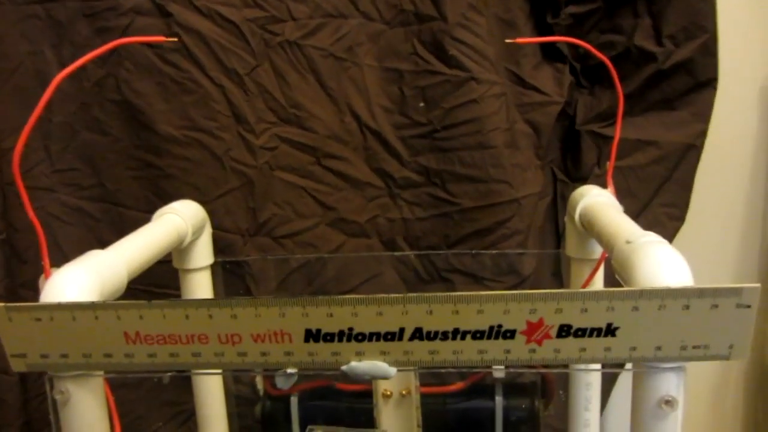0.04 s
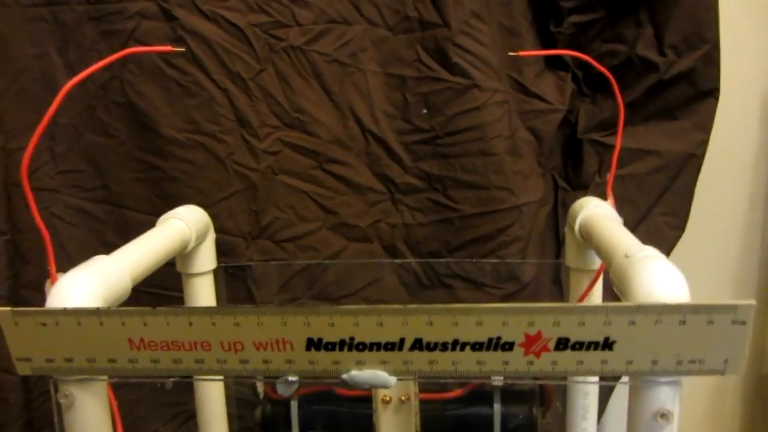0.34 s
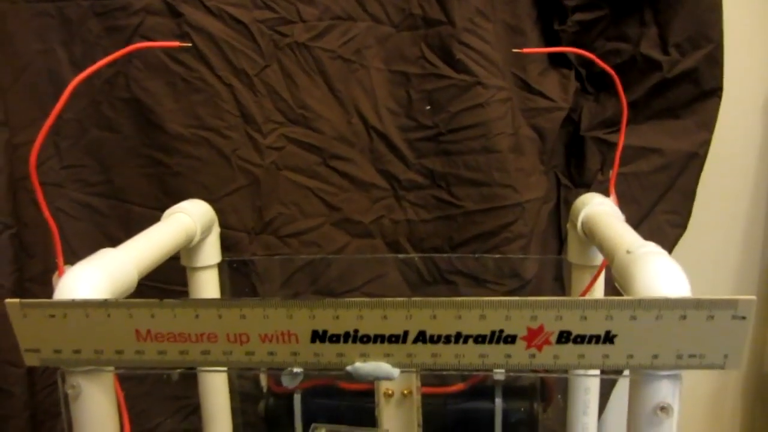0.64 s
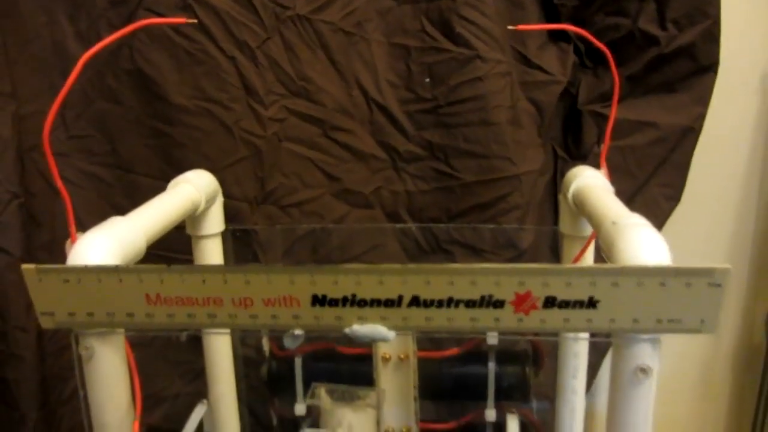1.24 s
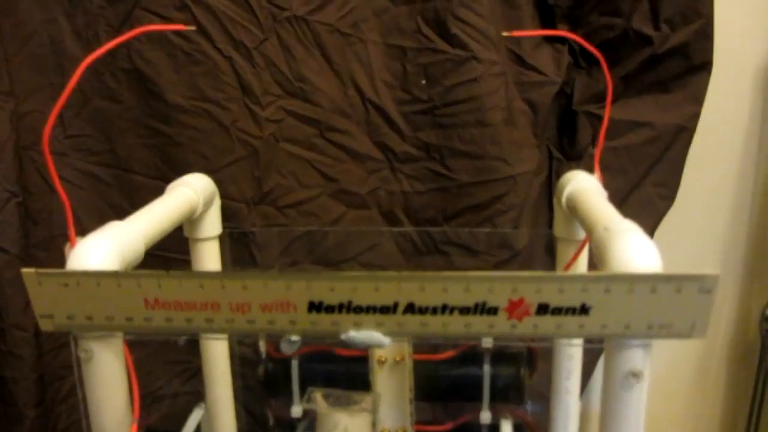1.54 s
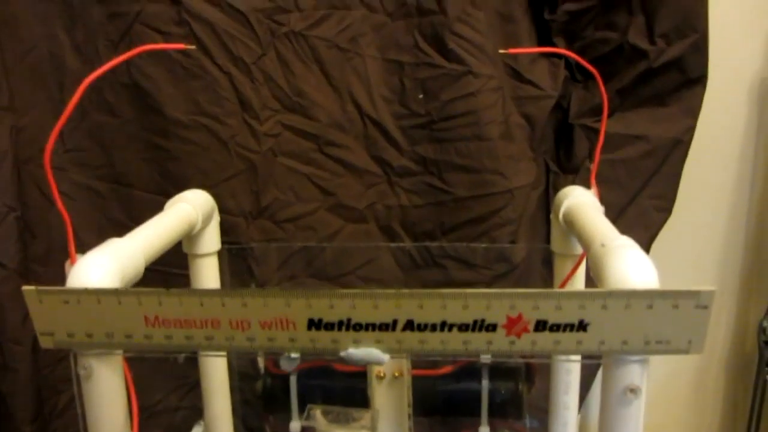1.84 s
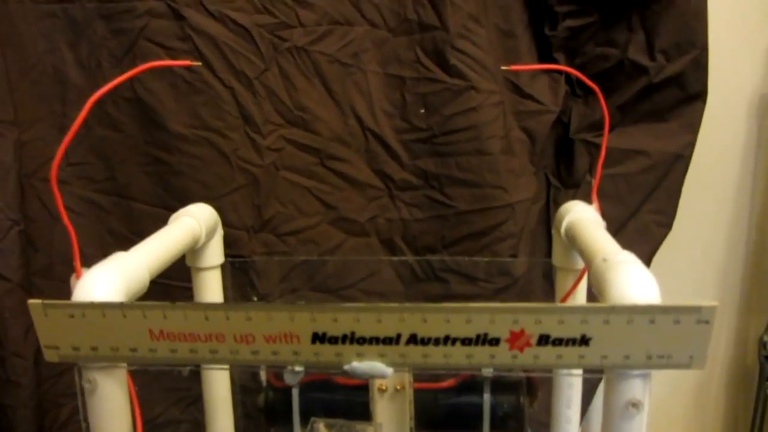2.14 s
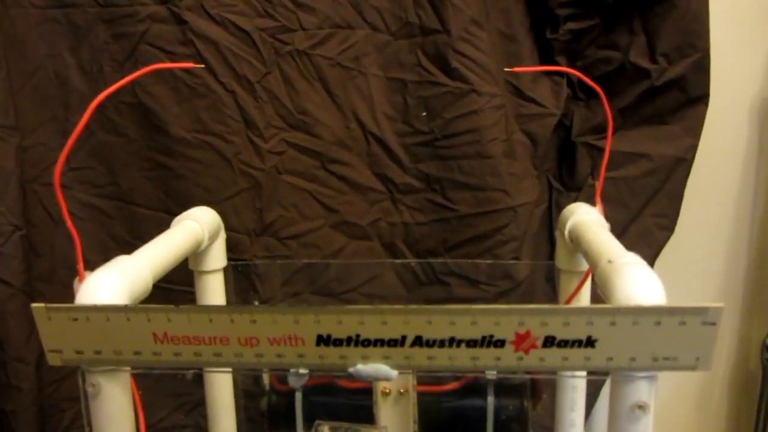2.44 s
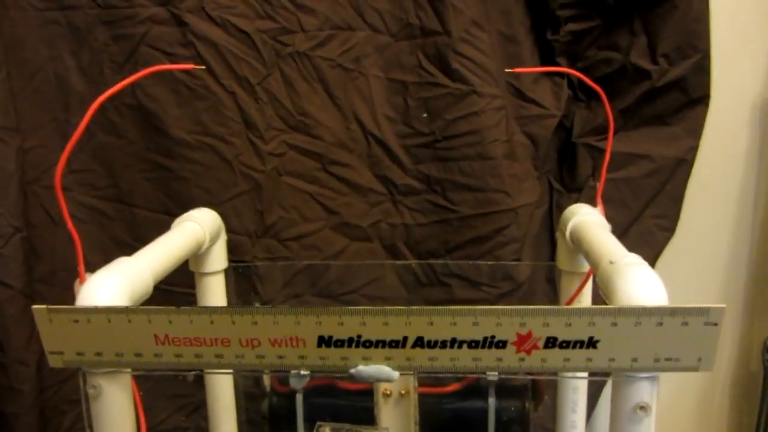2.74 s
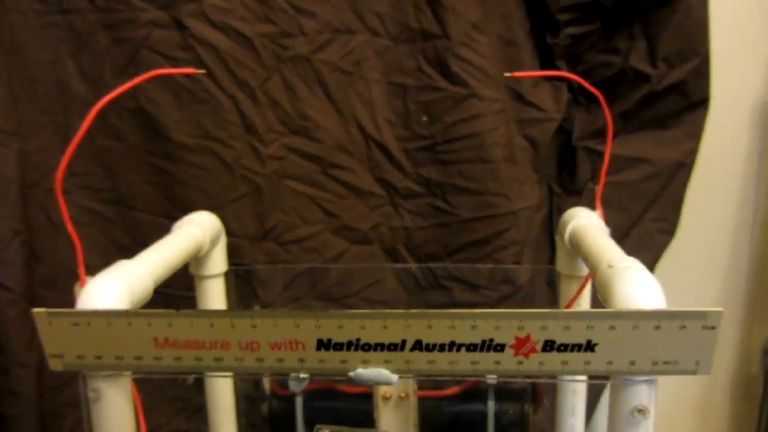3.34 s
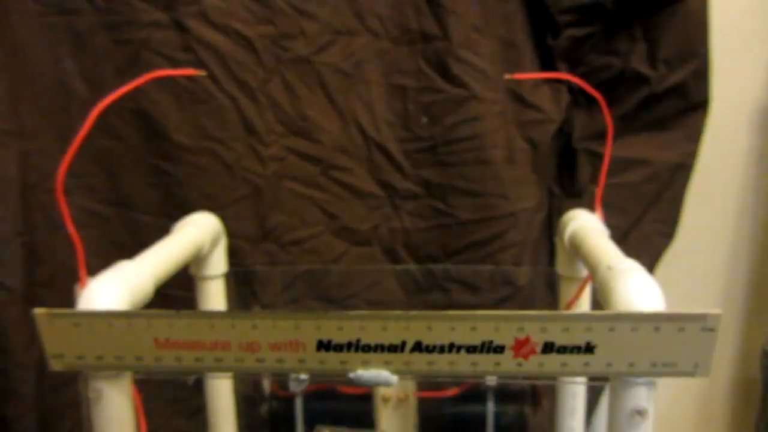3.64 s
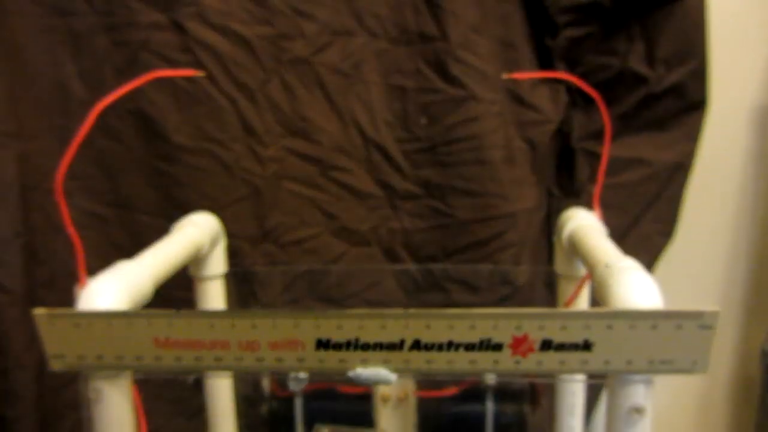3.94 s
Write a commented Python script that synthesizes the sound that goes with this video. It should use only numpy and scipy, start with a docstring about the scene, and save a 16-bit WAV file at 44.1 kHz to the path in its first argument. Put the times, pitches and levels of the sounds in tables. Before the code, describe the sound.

A single very loud electric spark cracks in a quiet room. Before it, a homemade generator whines faintly and small ticks thicken into a sputtering hiss. The crack overloads the nearby microphone and dies away quickly.

```python
"""High-voltage spark in a quiet room

A homemade generator charges, its driver whining faintly over the room tone. Corona ticks at the
electrodes, first singly, then in a sputtering hiss, until the gap breaks down in one crack.
The room's answer overloads the microphone, and the recorder's gain control ducks everything."""
import sys
import numpy as np
from scipy import signal
from scipy.fft import rfft, irfft, next_fast_len
from scipy.io import wavfile
from scipy.ndimage import map_coordinates

SR = 44100
rng = np.random.default_rng(int(sys.argv[2]) if len(sys.argv) > 2 else 0)


def persist_wave(psi):
    """Save psi, clipped to +-1, as 16-bit WAV."""
    counts = np.round(np.clip(psi, -1, 1) * 32767).astype(np.int16)
    wavfile.write(sys.argv[1], SR, np.atleast_2d(counts).T)


N = 176400

# Room tone EQ: f/Hz, level/dB
AIR_EQ = [(20, -31), (45, -10.5), (85, -1.5), (170, -4), (320, -6), (420, -8.5), (600, -9.5), (1000, -13),
          (1500, -16), (2800, -21.5), (4000, -29), (5300, -27), (7500, -31), (10000, -38), (11500, -48.5),
          (15500, -45)]
# Stereo width of the room tone: f/Hz, side level/dB
AIR_WIDTH = [(30, -2), (150, 9.5), (300, 5), (600, 4), (1000, 0.5), (2000, -2), (8000, -.5)]
# Pitch of the driver's whine: t/s, f/Hz
WHINE_PITCH = [(0, 12190), (.45, 12200), (.6, 12160), (1.15, 12135), (1.8, 12185), (3.5, 12200)]
# Level of the centre of the whine as the microphone drifts: t/s, level/dB
WHINE_LEVEL = [(0.0, -62.5), (0.1, -67.5), (0.52, -69), (0.56, -63), (1.12, -68.5), (1.18, -78.5),
               (1.65, -68), (1.78, -69.5), (2.61, -78), (2.85, -67), (3.12, -78), (3.5, -66)]
# Cues for the first single corona ticks: t/s
TICK_CUES = [1.992, 2.0135, 2.046, 2.062, 2.084, 2.090, 2.113, 2.120, 2.138, 2.165, 2.179, 2.1995, 2.220,
             2.2378, 2.2532, 2.2615, 2.2685, 2.275, 2.2895, 2.301, 2.3163, 2.3245, 2.350, 2.3565, 2.3595,
             2.3663, 2.373, 2.3875, 2.391, 2.4178, 2.4213, 2.426, 2.4442, 2.463, 2.468, 2.477, 2.481, 2.490]
# Dense corona sputter: t/s, lead ticks per second, share that set off a follower
SPUTTER = [(2.497, 185, 0.23), (2.8, 150, 0.37), (3.1, 130, .7), (3.55, 133, 1)]
# Tick EQ: f/Hz, level/dB
TICK_EQ = [(1000, -12), (4200, -14), (5200, -10.5), (6200, -1.5), (6800, 1), (7400, -6.5), (8150, -2.5),
           (8900, -9.5), (10600, -7.5), (12000, -15.5), (12900, -7), (13800, -12), (15800, -22)]
# Reverb time of the room: f/Hz, t60/s
ROOM_DECAY = [(100, 0.34), (300, 0.41), (650, 0.66), (1300, 0.51), (2500, .42), (5000, 0.47), (8000, 0.43),
              (14000, 0.33)]
# EQ of the spark channel's snap: f/Hz, level/dB
SNAP_EQ = [(150, -5.5), (1000, 0.5), (2300, 6.5), (6000, -4.5), (9000, -20), (15000, -27)]
# EQ of the short boom: f/Hz, level/dB
BOOM_EQ = [(25, -10), (80, -6), (180, 2), (330, -4), (450, -5), (900, -3.5), (2000, -23.5), (8000, -62)]
# EQ of the blast, the spark's overloaded reverb: f/Hz, level/dB
BLAST_EQ = [(30, -45), (90, -14.5), (150, -11.5), (260, -10), (380, -12), (600, -11), (1050, -8), (2300, 1),
            (4000, -4), (5300, -1), (7500, -4.5), (10000, -12.5), (12400, -23), (15500, -27)]
# Stereo width of blast and boom: f/Hz, side level/dB
BLAST_WIDTH = [(40, 0), (200, 4), (400, -2), (800, -5), (2500, -1), (8000, 0)]

SPARK_S = 3.5622  # the gap breaks down
TIME = np.arange(N) / SR


def amp(db):
    """Decibels to gain."""
    return 10 ** (np.asarray(db) / 20)


def unit(x):
    """Scale to rms 1."""
    return x / np.sqrt(np.mean(x ** 2) + 1e-20)


def along(points, hz):
    """Read a curve on a log frequency axis."""
    freqs, values = np.transpose(points)
    return np.interp(np.log(hz + 1), np.log(freqs + 1), values)


def automation(rows):
    """One per-sample lane for each column after the time."""
    times, *columns = np.transpose(rows)
    return [np.interp(TIME, times, column) for column in columns]


def wobble(rate):
    """A smooth random curve, rate knots a second."""
    return map_coordinates(rng.standard_normal(N // 20), [TIME * rate], mode="wrap")


def decay(t, t60):
    """Gain that holds until t = 0, then falls 60 dB every t60 seconds."""
    return np.exp(-np.log(1000) * np.maximum(t, 0) / t60)


def filtered(x, response):
    """Zero-phase filter, given its gain as a function of frequency."""
    size = next_fast_len(N + SR // 2)
    return irfft(rfft(x, size) * response(np.fft.rfftfreq(size, 1 / SR)), size)[..., :N]


def equalised(x, eq):
    """Minimum-phase EQ, scaled so that white noise keeps its level."""
    size = 2 * next_fast_len(N)
    gain = unit(amp(along(eq, np.fft.rfftfreq(size, 1 / SR))))
    cepstrum = irfft(np.log(gain))
    cepstrum[1:size // 2] *= 2
    cepstrum[size // 2 + 1:] = 0
    return irfft(rfft(x, size) * np.exp(rfft(cepstrum)), size)[..., :N]


def noise(eq):
    """Coloured stereo noise of rms 1."""
    return unit(equalised(rng.standard_normal((2, N)), eq))


def widened(x, width):
    """The microphone spreads diffuse sound by lifting its close ports' difference, most in the bass."""
    mid = (x[0] + x[1]) / 2
    side = filtered((x[0] - x[1]) / 2, lambda hz: amp(along(width, hz)))
    return np.array([mid + side, mid - side])


def room_tone(drone_hz=89):
    """A bed of steady air with a low, unsteady drone."""
    drone = unit(np.sin(2 * np.pi * np.cumsum(drone_hz + 4 * wobble(14)) / SR))
    return widened(amp(-50) * noise(AIR_EQ), AIR_WIDTH) + amp(-66) * drone


def driver_whine(waver_hz=6):
    """The thin whine of the high-voltage supply swells and fades as the hand-held microphone drifts."""
    pitch, = automation(WHINE_PITCH)
    level_db, = automation(WHINE_LEVEL)
    phase = 2 * np.pi * np.cumsum(pitch + waver_hz * wobble(40)) / SR
    mid = amp(level_db) * unit(np.sin(phase))
    side = amp(-68.5 + 0.67 * wobble(5.5)) * unit(np.cos(phase))  # what differs between the ports
    return np.array([mid + side, mid - side])


def tick_times(count=400, recharge_spread=0.3, follow_s=0.0018):
    """The electrode recharges after each tick; at higher voltage a tick sets off one or two more."""
    rate, share = automation(SPUTTER)
    charge = np.cumsum(rate * (TIME > SPUTTER[0][0])) / SR
    gaps = np.exp(recharge_spread * rng.standard_normal(count))
    lead = np.interp(np.cumsum(gaps) - gaps[0] / 2, charge, TIME)
    chance = rng.random(count)
    delay = follow_s * (0.5 + rng.random(count))
    share = np.interp(lead, TIME, share)
    second = (lead + delay)[chance < share]
    third = (lead + 2 * delay)[chance < share ** 2]
    times = np.concatenate([TICK_CUES, lead, second, third])
    return times[times < SPARK_S]


def room_tail():
    """One second of stereo reverb; each frequency dies at its own speed."""
    hz, t, spectrum = signal.stft(rng.standard_normal((2, SR)), SR, nperseg=256)
    return signal.istft(spectrum * decay(t, along(ROOM_DECAY, hz)[:, None]), SR)[1][:, :SR]


def corona(rise_s=0.00018, send_db=-5.5):
    """Tiny, equal discharges, smeared by the frame and the room, until the spark drains the charge."""
    pulses = amp(-31) * np.bincount(np.round(tick_times() * SR).astype(int), minlength=N)
    age = TIME[:SR // 20]
    frame_scatter = (decay(age, t60=0.005) * (1 - np.exp(-age / rise_s))) ** 2
    power = signal.fftconvolve(pulses ** 2, frame_scatter / frame_scatter.sum())[:N]
    close = np.sqrt(np.abs(power)) * np.sign(rng.standard_normal((2, N)))
    tail = room_tail()
    reverb = signal.fftconvolve(close, tail / np.linalg.norm(tail[0]), axes=1)[:, :N]
    return equalised(close + amp(send_db) * reverb, TICK_EQ)


def spark(rise_s=0.0001, push_s=0.00099):
    """The gap breaks down: a shock wave's push, the snap of the spark channel, then the room."""
    age = np.maximum(TIME - SPARK_S, 0)
    attack = (1 - np.exp(-age / rise_s)) ** 2
    shock = amp([[15.5], [-12]]) * (1 - age / push_s) * np.exp(-age / push_s)  # hard left
    snap = amp(12) * decay(age, t60=0.0046) * noise(SNAP_EQ)
    return attack * (shock + snap + room_answer(age))


def room_answer(age, near_wall_s=0.00098, far_wall_s=0.013, build_s=0.006, boom_hold_s=0.033):
    """The spark's reverb, flattened by the overloaded microphone and at first choked by a short boom."""
    onset = round((SPARK_S + near_wall_s) * SR)
    tail = np.pad(room_tail(), ((0, 0), (onset, 0)))[:, :N]
    build = 1 - np.exp(-age / build_s)
    boom = decay(age - boom_hold_s, t60=0.12) * noise(BOOM_EQ)
    choke = np.sqrt(1 + (amp(13.5) * boom) ** 2)
    squashed = np.clip(amp(12) * build * tail / choke, -1, 1)
    blast = amp(5.5) * equalised(squashed, BLAST_EQ)
    lull = amp(-3.5 * (1 - np.tanh((age - far_wall_s) / 0.001)) / 2)  # until the far walls answer
    return lull * widened(blast + amp(0.5) * build * boom, BLAST_WIDTH)


def scene():
    """The mix at the microphone."""
    return room_tone() + driver_whine() + corona() + spark()


def record(dry):
    """Gain control ducks fast and stays down; what slips past it clips; a high cut follows."""
    threshold_db, attack_s, lag_s = -12, 0.0011, 0.00115
    clip_hardness, high_cut_hz = 4, 15850
    pole = np.exp(-1 / (attack_s * SR))
    power = signal.lfilter([1 - pole], [1, -pole], np.mean(dry ** 2, axis=0))
    over_db = np.maximum(10 * np.log10(power + 1e-12) - threshold_db, 0)
    duck_db = np.maximum.accumulate(over_db)
    ducked = dry * amp(-np.interp(TIME - lag_s, TIME, duck_db))
    clipped = ducked / (1 + np.abs(ducked) ** clip_hardness) ** (1 / clip_hardness)
    return filtered(clipped, lambda hz: hz < high_cut_hz)


dry = scene()
out = record(dry)
persist_wave(out)
```